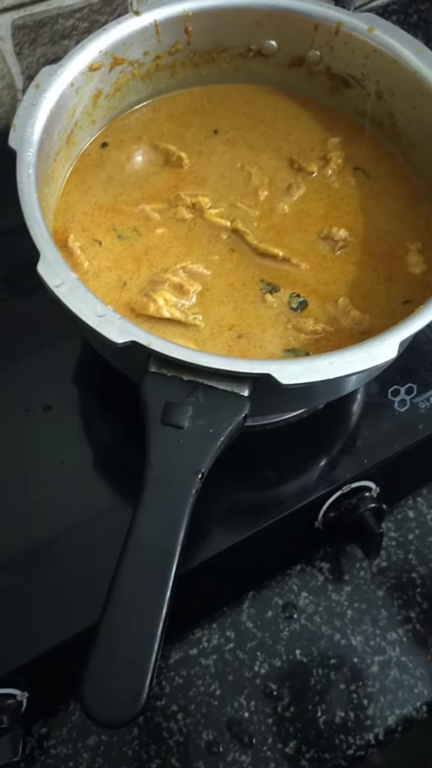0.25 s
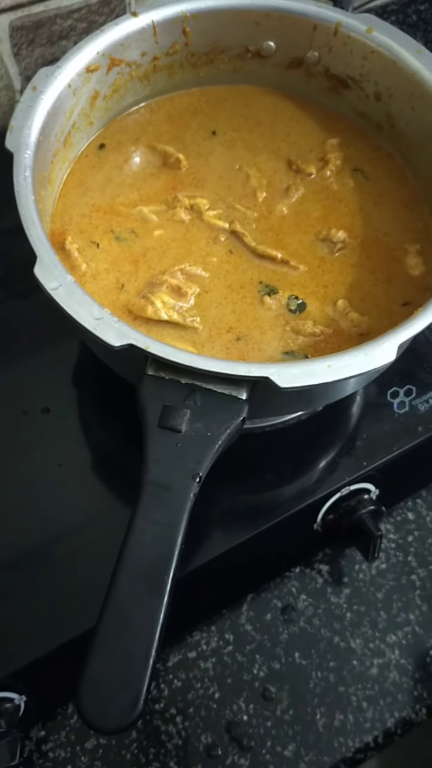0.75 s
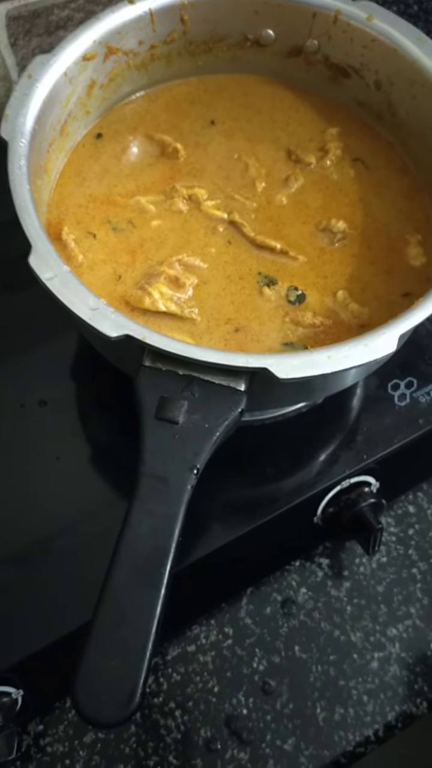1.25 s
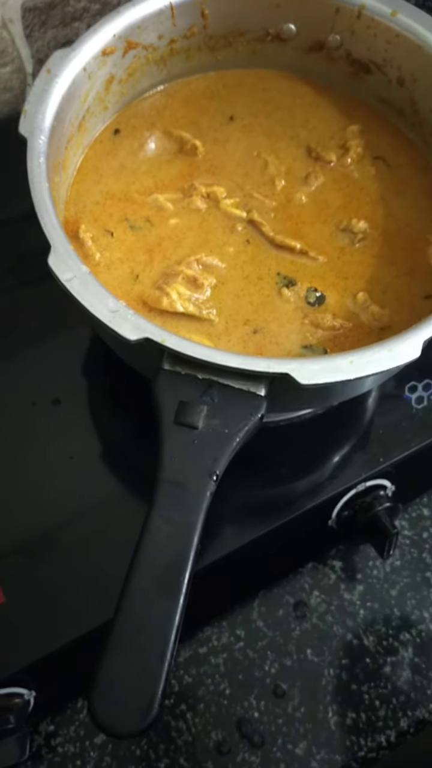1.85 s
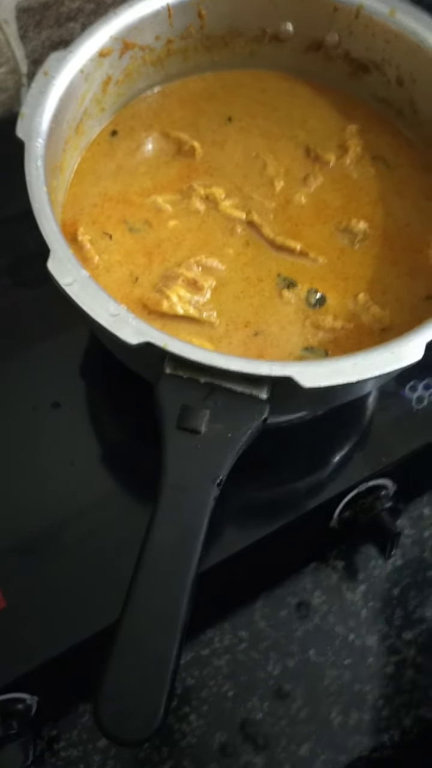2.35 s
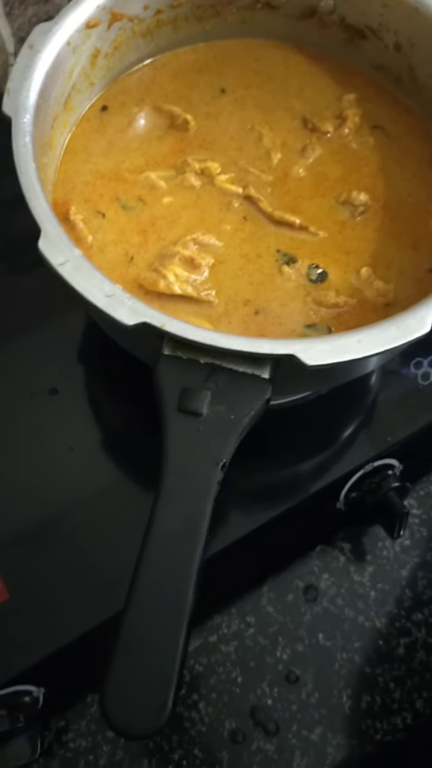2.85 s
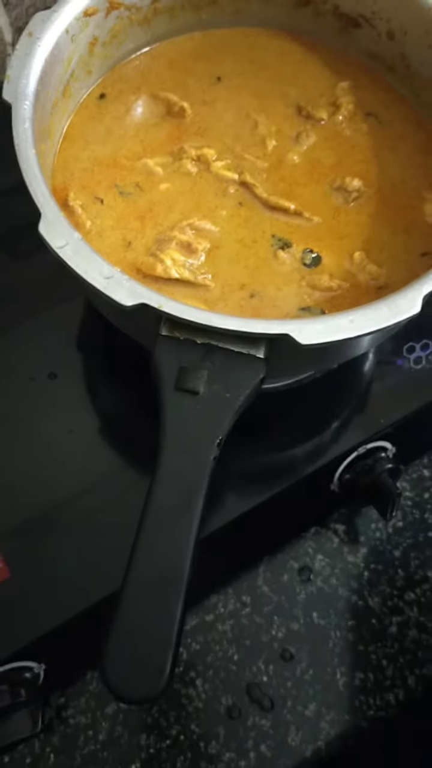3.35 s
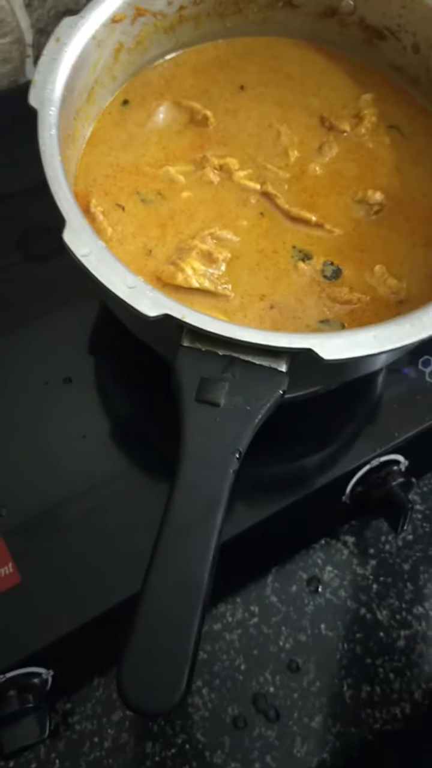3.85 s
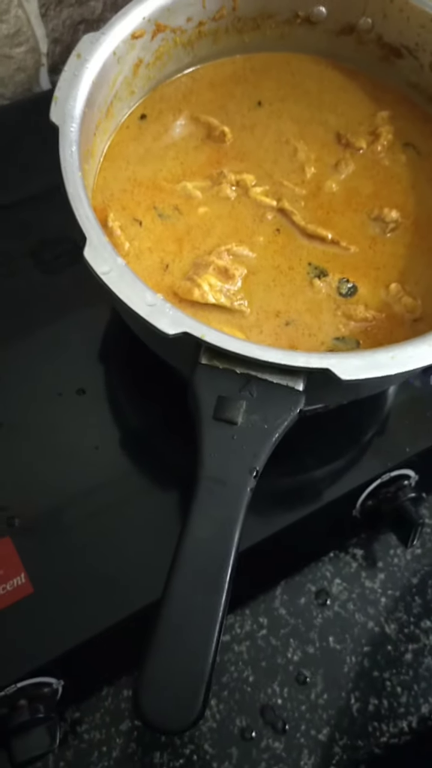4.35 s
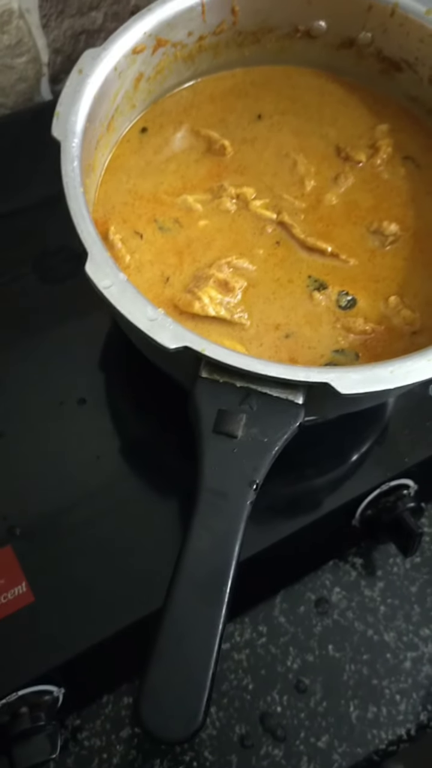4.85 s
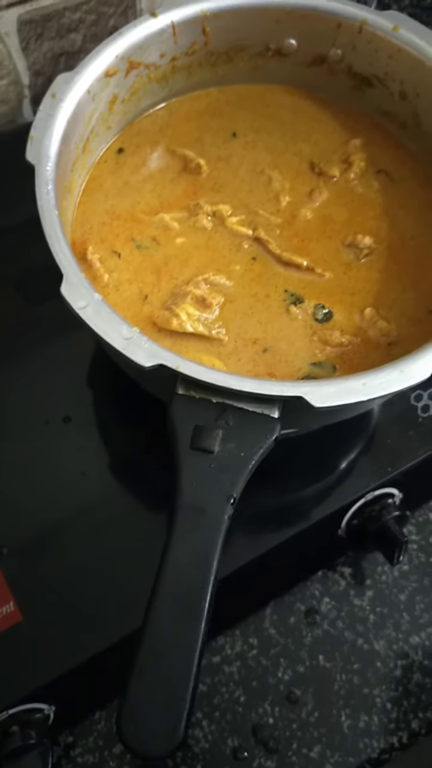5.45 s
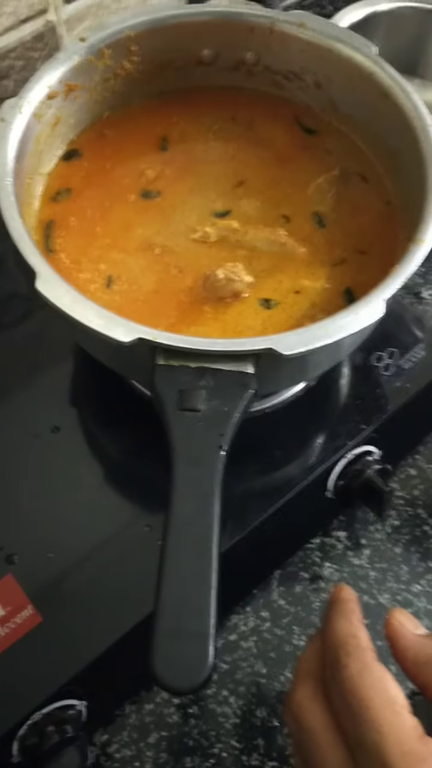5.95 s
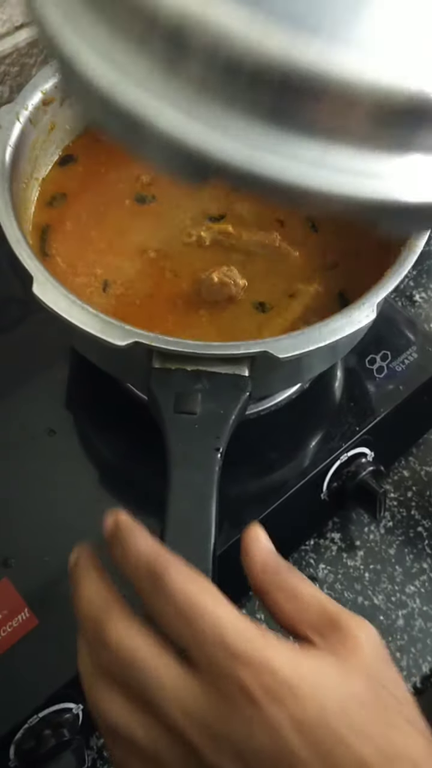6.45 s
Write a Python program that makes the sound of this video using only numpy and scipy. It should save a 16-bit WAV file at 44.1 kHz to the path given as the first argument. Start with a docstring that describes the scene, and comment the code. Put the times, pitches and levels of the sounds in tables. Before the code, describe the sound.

In a small kitchen, a utensil knocks twice, a heavy pan thuds down, then a thin metal lid clinks, clanks and sweeps past.

```python
"""Small hard-walled kitchen: a utensil is knocked twice and a pan set down beside an open pressure cooker.
The metal lid is picked up: it clinks, clanks and scrapes, then swings past with a low flutter of air.
Blows are bursts of dense echoes plus decaying modes; scrapes are trains of tiny slips; air is shaped noise.
A faint low tone swells early on; soft steady room noise with faint wavering tones lies under it all."""
import sys
import numpy as np
from scipy import signal
from scipy.fft import rfft, irfft, next_fast_len
from scipy.io import wavfile
from scipy.ndimage import uniform_filter1d

SR = 44100
rng = np.random.default_rng(int(sys.argv[2]) if len(sys.argv) > 2 else 0)


def waveform_to_disk(signal):
    """Save audio, clipped to [-1, 1], as 16-bit WAV at the path in sys.argv[1]."""
    frames = np.transpose(np.atleast_2d(signal))
    scaled = np.clip(frames, -1, 1) * 32767
    samples = np.round(scaled).astype(np.int16)
    wavfile.write(sys.argv[1], SR, samples)


N = 295029

# Blows on the lid: (time [s], level [dB], hardness [dB], favoured pitch [Hz], lead of favoured modes [dB])
LID_BLOWS = [(3.611, -52, -7, 1346, 34.5), (3.685, -20.5, 12, 1307, 15), (3.697, -24, 11, 3120, 13),
             (3.722, -23.5, -7, 1304, 14.5), (3.8435, -28.5, 11, 1570, 18), (4.081, -44, 6.5, 1450, 23),
             (4.1385, -32.5, -3, 1453, 21), (5.074, -24.5, 1, 833, 30), (5.082, -20, 3, 1236, 10),
             (5.094, -17.5, -8.5, 851, 20), (5.115, -25.5, -13.5, 1841, 25.5), (6.612, -55, -7, 1850, 24)]
# Heavy pan set down and rocking once; a faint dull clunk later: columns as LID_BLOWS
PAN_BLOWS = [(2.3538, -16.5, 3.5, 940, 8.5), (2.378, -25.5, 16, 1185, 12), (2.9025, -39, 8.5, 3070, 8.5),
             (2.938, -60.5, 4, 1685, 26.5), (3.05, -55.5, 11, 1610, 8), (5.682, -55.5, -14, 1184, -2)]
# Knocks of the utensil: columns as LID_BLOWS
UTENSIL_BLOWS = [(1.1068, -29, 4, 672, 11), (1.2865, -25.5, -3.5, 862, 3.5), (1.303, -30.5, -16, 1421, -2)]
# Ringing modes of each object: (frequency [Hz], level [dB], t60 [s])
LID_MODES = [(864.1, -7, 0.32), (926, -4, 0.25), (1164, -22, .2), (1245, 1, 0.26), (1290, -0.5, 0.21),
             (1392.3, 5, 0.2), (1404, -1.5, 0.16), (1664, -9.5, 0.43), (1834, -2.5, 0.22),
             (1881, -5.5, 0.49), (1920, 2, 0.25), (2400, -7, 0.23), (3130, 1, 0.17), (3157, -2, 0.13),
             (3770, -12, 0.48), (5420, -5, 0.2), (6150, -3, 0.11), (9000, -9, 0.12), (9655, -18, 0.22)]
PAN_MODES = [(255.4, -3.5, 0.15), (370.7, -9, 0.53), (622, -0.5, 0.2), (870, 0.5, 0.37), (971, 3.5, .42),
             (1186, 4.5, 0.39), (1514.5, 3.5, 0.55), (1620, -8, 0.8), (1673, 3, 0.41), (2030, -6, 0.81),
             (2105, -11, .42), (2268, 0, 0.53), (2353, 1.5, 0.56), (2590, -2, 0.2), (3180, 3.5, 0.34),
             (3520, -9, 0.45)]
UTENSIL_MODES = [(685, -0.5, 0.13), (721.5, -6.5, 0.21), (876, 5, 0.13), (915, -1.5, .14),
                 (1400, -7.5, .23), (2010, -18, 0.12), (2470, -6, 0.079), (3410, -13, 0.076),
                 (3620, -17, 0.18), (3640, -20, 0.18)]
# Spectrum of the dense, short-lived part of a blow: (frequency [Hz], relative density [dB per Hz])
LID_BODY_SPECTRUM = [(200, -2.5), (550, 1.5), (900, 1.5), (1060, 3), (1350, 14), (1650, 2.5), (2200, 2),
                     (2700, -6.5), (3200, 2.5), (4600, -15.5), (7600, -17.5), (9400, -4), (11000, -19),
                     (13000, -14), (15500, -25)]
PAN_BODY_SPECTRUM = [(135, -8), (190, -16.5), (260, -0.5), (470, -8), (680, -1.5), (1000, 3), (1400, 1.5),
                     (2100, 0.5), (2850, -7), (3700, -6), (4900, -14.5), (7000, -16), (9500, -12.5),
                     (11000, -26.5), (12700, -17), (15500, -29)]
UTENSIL_BODY_SPECTRUM = [(300, -7.5), (720, 3), (1100, -1), (2200, -0.5), (2950, -11), (3450, -1),
                         (4100, -8), (4800, -17), (7800, -11.5), (11000, -19), (15500, -23)]
# Things sliding and brushing: (start [s], length [s], level [dB], low edge [Hz], hardness [dB])
SCRAPE_STROKES = [(1.614, 0.18, -66.5, 7350, 4), (1.832, 0.078, -68, 7500, 1),
                  (2.234, 0.13, -52.5, 810, 8.5), (4.868, 0.092, -53.5, 860, -18),
                  (6.235, .11, -54, 326, 10.5), (6.322, 0.3, -53.5, 245, 6.5)]
# Dull bumps of the hand taking hold: (time [s], level [dB])
HAND_BUMPS = [(6.373, -44), (6.651, -39.5)]
# Lid and hand sweeping air close by: (start [s], length [s], level [dB])
AIR_SWEEPS = [(6.215, 0.22, -54.5), (6.335, .3, -37), (6.621, 0.15, -34)]
# Spectrum of the swept air: (frequency [Hz], relative density [dB per Hz])
AIR_SPECTRUM = [(20, 3.5), (45, 6), (70, -16), (100, -5), (140, -0.5), (195, -24.5), (270, -12.5),
                (450, -22.5), (700, -23.5), (1500, -55)]
# Spectrum of the room noise: (frequency [Hz], relative density [dB per Hz])
ROOM_SPECTRUM = [(20, 1), (45, -11.5), (65, -12.5), (140, -15), (190, -18.5), (260, -15), (330, -19),
                 (550, -23), (950, -20), (1700, -20), (2300, -18), (3000, -31), (4700, -38), (6800, -40.5),
                 (8800, -37), (15800, -39)]
# Faint wavering tones in the room noise: (frequency [Hz], level [dB])
ROOM_TONES = [(135, -74), (275, -88), (620, -79), (2190, -77)]

ROOM_NOISE_DB = -55.5
BAND_LIMIT_HZ = 15950
FILTER_SIZE = 8192  # FFT length of the contact filters
HZ = np.fft.rfftfreq(FILTER_SIZE, 1 / SR)
RING_SAMPLES = 28000  # length of each blow
MEDIUM_BLOW_DB = -30
HARDNESS_DB_PER_OCTAVE = 28  # a harder contact is shorter, so its spectrum reaches higher


def lid():
    """Thin lid: slow contact, short clatter, strong shimmer of upper modes."""
    return blows(LID_BLOWS, LID_BODY_SPECTRUM, LID_MODES,
                 low_hz=1000, deepen_octaves_per_db=0.03, top_hz=2960,
                 t60_s=0.18, tail_db=-19.5, tail_t60_s=0.72,
                 ring_db=-11.5, shimmer_db=-3, contact_s=0.0031, reach_octaves=0.082)


def pan():
    """Heavy pan: low spectrum, longer clatter, weak ring."""
    return blows(PAN_BLOWS, PAN_BODY_SPECTRUM, PAN_MODES,
                 low_hz=277, deepen_octaves_per_db=0.1, top_hz=2770,
                 t60_s=0.33, tail_db=-14.5, tail_t60_s=0.74,
                 ring_db=-16, shimmer_db=-12, contact_s=0.00045, reach_octaves=0.11)


def utensil():
    """Utensil: very fast contact, strong short ring at narrowly favoured pitches."""
    return blows(UTENSIL_BLOWS, UTENSIL_BODY_SPECTRUM, UTENSIL_MODES,
                 low_hz=713, deepen_octaves_per_db=0.2, top_hz=3550,
                 t60_s=0.22, tail_db=-25.5, tail_t60_s=0.79,
                 ring_db=-1, shimmer_db=-8.5, contact_s=0.00012, reach_octaves=0.051)


def blows(rows, body, modes, low_hz, deepen_octaves_per_db, top_hz, t60_s, tail_db, tail_t60_s,
          ring_db, shimmer_db, contact_s, reach_octaves):
    """Each blow is a burst of clatter that builds over the contact, with the metal ringing on behind it."""
    out, t = np.zeros(N), np.arange(RING_SAMPLES) / SR
    upper = gain_of(shimmer_db) * shimmer(t)
    rings = gain_of(ring_db) * ring(t, modes)
    mode_hz = np.transpose(modes)[0]
    for start_s, db, hardness_db, favoured_hz, lead_db in rows:
        # heavier reaches lower; harder reaches higher and builds faster
        low_edge_hz = low_hz * 2 ** (deepen_octaves_per_db * (MEDIUM_BLOW_DB - db))
        high_edge_hz = top_edge(top_hz, hardness_db)
        build = 1 - np.exp(-t * gain_of(hardness_db) / contact_s)
        raw = build * (clatter(t, t60_s, tail_db, tail_t60_s) + upper)
        spectrum = contact(body, low_edge_hz, high_edge_hz, hardness_db)
        burst = coloured(raw, spectrum * treble_ripple())
        # modes near the favoured pitch lead; a soft contact barely wakes the high ones
        near = np.exp(-(np.log2(mode_hz / favoured_hz) / reach_octaves) ** 2)
        woken = gain_of(lead_db * near) / np.hypot(1, (mode_hz / high_edge_hz) ** 2)
        add(out, start_s, gain_of(db) * (burst + woken @ rings))
    return out


def ring(t, modes, rise_s=0.0035, waver=0.18, waver_s=0.013):
    """One dying sine a mode; reflections make each of them waver."""
    hz, db, t60_s = np.transpose(modes)[:, :, None]
    white = rng.standard_normal((2, len(modes), len(t)))
    smooth = uniform_filter1d(white, round(waver_s * SR))
    in_phase, quadrature = (evened(z) for z in smooth)
    phase = 2 * np.pi * hz * t
    tone = (1 + waver * in_phase) * np.sin(phase) + waver * quadrature * np.cos(phase)
    return tone * gain_of(db - 60 * t / t60_s) * (1 - np.exp(-t / rise_s))


def shimmer(t, count=130, low_hz=2400, t60_s=0.22, spread_s=0.012):
    """Crowd of weak upper modes of thin metal; a blow's energy takes a moment to spread into them."""
    hz, start_turns = rng.random((2, count, 1))
    hz = low_hz + hz * (BAND_LIMIT_HZ - low_hz)
    crowd = evened(np.cos(2 * np.pi * (hz * t + start_turns)).sum(0))
    return crowd * gain_of(-60 * t / t60_s) * (1 - np.exp(-t / spread_s))


def clatter(t, t60_s, tail_db=-28, tail_t60_s=0.84, density=0.2):
    """Dense reflections off counter and tiles, then the faint tail of the kitchen."""
    arrivals = evened(1. * (rng.random(len(t)) < density))
    echoes = rng.choice([-1., 1.], len(t)) * arrivals
    return echoes * np.hypot(gain_of(-60 * t / t60_s), gain_of(tail_db - 60 * t / tail_t60_s))


def contact(body, low_hz, top_hz, treble_db, bass_leak_db=-33, top_leak_db=-11, click_hz=6500):
    """Gain at HZ of one contact: body spectrum between two edges, treble shifted by hardness."""
    low = gain_of(bass_leak_db) + 1 / np.hypot(1, (low_hz / (HZ + 1)) ** 10)
    top = gain_of(top_leak_db) + 1 / np.hypot(1, (HZ / top_hz) ** 4)
    treble_shelf_db = treble_db / (1 + (click_hz / (HZ + 1)) ** 6)
    return gain_of(read(body, HZ) + treble_shelf_db) * low * top


def top_edge(top_hz, hardness_db):
    """Upper edge [Hz] of a contact's spectrum, rising with its hardness."""
    return top_hz * 2 ** (hardness_db / HARDNESS_DB_PER_OCTAVE)


def treble_ripple(ripple_db=4, ripple_hz=200, from_hz=2200):
    """Random smooth ripple in the treble gain, drawn anew for each blow."""
    ripple = evened(uniform_filter1d(rng.standard_normal(len(HZ)), round(ripple_hz / HZ[1])))
    return gain_of(ripple_db * ripple * np.minimum(HZ / from_hz, 1) ** 2)


def scrapes(slips_per_s=5000, top_hz=2300):
    """Many tiny slips of uneven size under one smooth stroke."""
    out = np.zeros(N)
    for start_s, length_s, db, low_hz, hardness_db in SCRAPE_STROKES:
        n = round(length_s * SR)
        slips = rng.standard_normal(SR) * (rng.random(SR) < slips_per_s / SR)
        spectrum = contact(PAN_BODY_SPECTRUM, low_hz, top_edge(top_hz, hardness_db), hardness_db)
        rub = evened(coloured(slips[:n], spectrum))
        add(out, start_s, gain_of(db) * rub * signal.windows.tukey(n, 0.5))
    return out


def bumps(low_hz=160, top_hz=900, hardness_db=0, t60_s=0.16, contact_s=0.0068):
    """Soft contacts: a short low clatter, too damped to ring."""
    out, t = np.zeros(N), np.arange(RING_SAMPLES) / SR
    for start_s, db in HAND_BUMPS:
        thud = (1 - np.exp(-t / contact_s)) * clatter(t, t60_s)
        spectrum = contact(PAN_BODY_SPECTRUM, low_hz, top_hz, hardness_db)
        add(out, start_s, gain_of(db) * coloured(thud, spectrum))
    return out


def air(rise_s=0.038, fall_s=0.12):
    """Low flutter as lid and hand sweep close by: noise that rises, holds and falls with each sweep."""
    t = np.arange(N) / SR
    level = np.zeros(N)
    for start_s, length_s, db in AIR_SWEEPS:
        ramps = np.minimum((t - start_s) / rise_s, (start_s + length_s - t) / fall_s)
        level += gain_of(db) * np.clip(ramps, 0, 1)
    return level * noise(AIR_SPECTRUM)


def low_swell(start_s=0.928, length_s=0.19, hz=260, db=-60):
    """A faint low sine that swells and fades."""
    out, t = np.zeros(N), np.arange(round(length_s * SR)) / SR
    tone = np.sin(2 * np.pi * hz * t)
    add(out, start_s, gain_of(db) * tone * signal.windows.tukey(len(t), 0.5))
    return out


def room_noise(drift_db=0.5, drift_s=0.28, waver=0.62, waver_s=0.22):
    """Soft shaped noise that drifts a little in level, with a few wavering tones."""
    def slow(seconds):
        return evened(uniform_filter1d(rng.standard_normal(N), round(seconds * SR), mode="wrap"))
    t = np.arange(N) / SR
    tones = np.zeros(N)
    for hz, db in ROOM_TONES:
        tones += gain_of(db) * evened((1 + waver * slow(waver_s)) * np.sin(2 * np.pi * hz * t))
    return gain_of(ROOM_NOISE_DB + drift_db * slow(drift_s)) * noise(ROOM_SPECTRUM) + tones


def noise(points):
    """Steady noise of a given spectrum, rms 1."""
    size = next_fast_len(N)
    gain = gain_of(read(points, np.fft.rfftfreq(size, 1 / SR)))
    return evened(irfft(rfft(rng.standard_normal(size)) * gain, size)[:N])


def coloured(x, gain):
    """Causal (minimum-phase) filter of unit energy, shaped by the gain at each of HZ."""
    log_gain = np.log(np.maximum(np.r_[gain, gain[-2:0:-1]], 1e-5))
    response = np.exp(np.conj(signal.hilbert(log_gain)))
    taps = np.fft.ifft(response).real[:FILTER_SIZE // 2]
    return signal.fftconvolve(x, taps / np.linalg.norm(taps))[:len(x)]


def gain_of(db):
    """Decibels to amplitude."""
    return 10 ** (np.asarray(db) / 20)


def evened(x):
    """Scales to rms 1."""
    return x / np.sqrt(np.mean(x ** 2) + 1e-20)


def read(points, hz):
    """Reads a spectrum on a log-frequency axis."""
    f, value = np.transpose(points)
    return np.interp(np.log(hz + 1), np.log(f + 1), value)


def add(mix, start_s, sound):
    """Mixes a sound in at its start time, cut at the end of the mix."""
    part = mix[round(start_s * SR):][:len(sound)]
    part += sound[:len(part)]


def scene():
    """Sums all sources at one point, the same in both channels."""
    struck = lid() + pan() + utensil()
    handled = scrapes() + bumps() + air()
    mix = struck + handled + low_swell() + room_noise()
    return np.array([mix, mix])


def record(dry, side_db=-15, side_from_hz=4400):
    """A little filtered treble, added to one channel and subtracted from the other, gives slight width."""
    highpass = signal.butter(12, side_from_hz, "high", fs=SR, output="sos")
    treble = signal.sosfilt(highpass, dry[0])
    random_taps = rng.standard_normal(256)
    random_taps /= np.linalg.norm(random_taps)
    side = gain_of(side_db) * signal.fftconvolve(treble, random_taps)[:N]
    band_limit = signal.firwin(511, BAND_LIMIT_HZ, window=("kaiser", 9), fs=SR)
    return signal.oaconvolve(dry + np.array([side, -side]), band_limit[None], "same")


dry = scene()
out = record(dry)
waveform_to_disk(out)
```